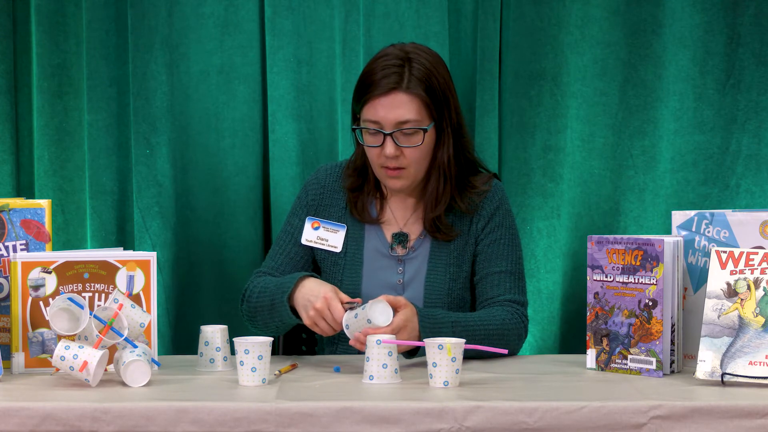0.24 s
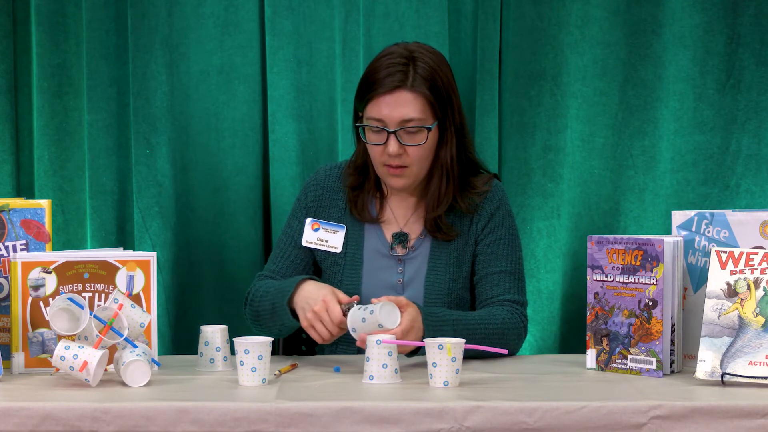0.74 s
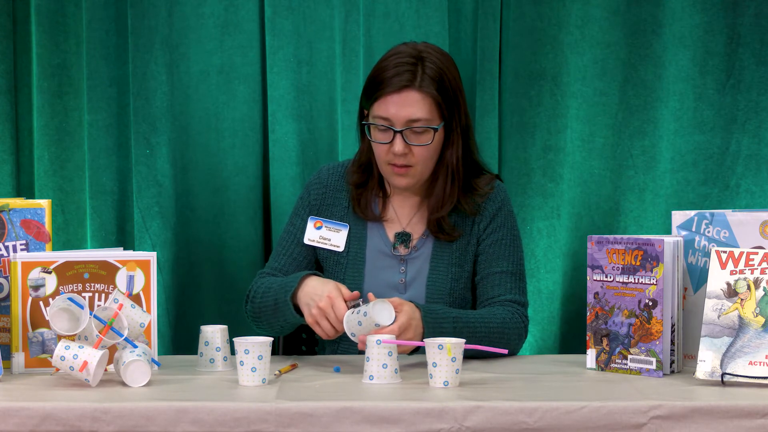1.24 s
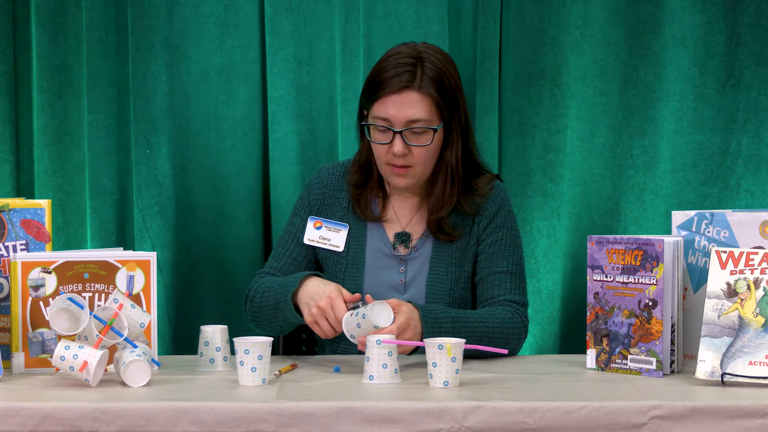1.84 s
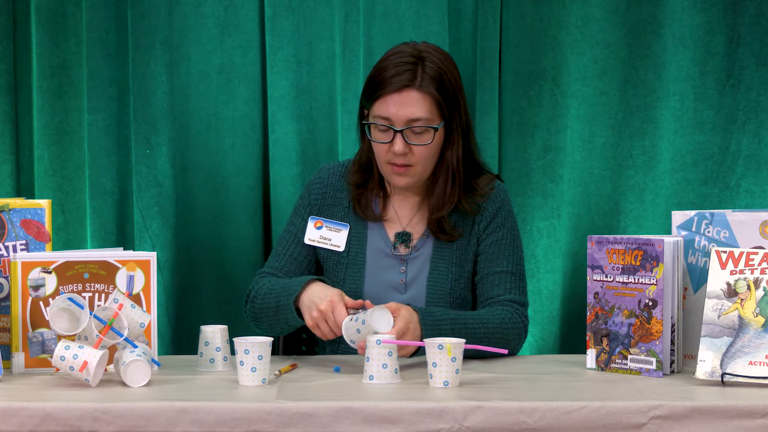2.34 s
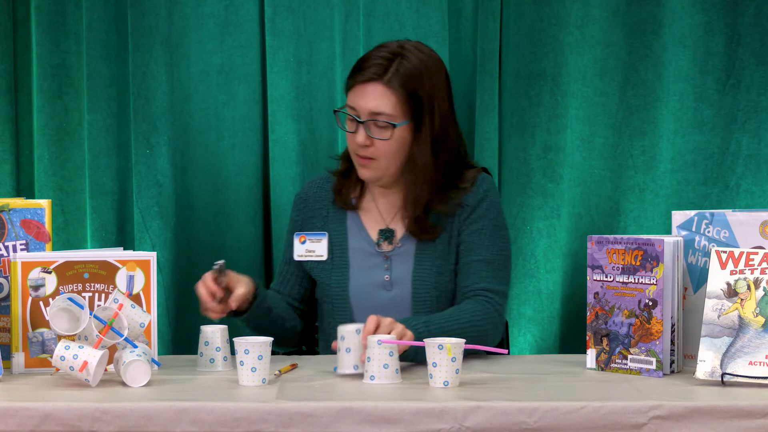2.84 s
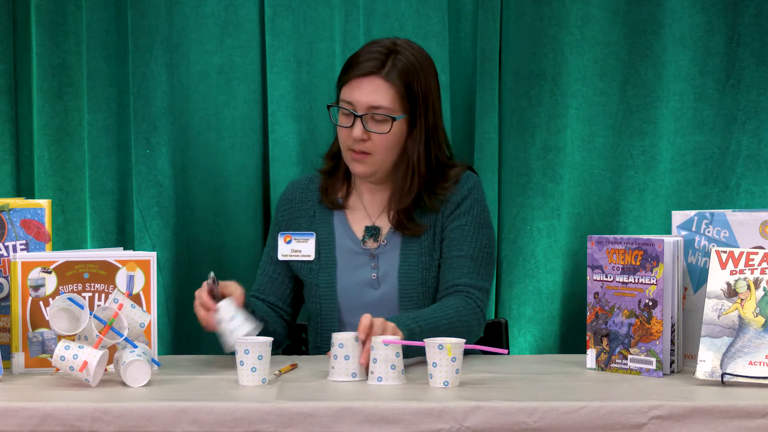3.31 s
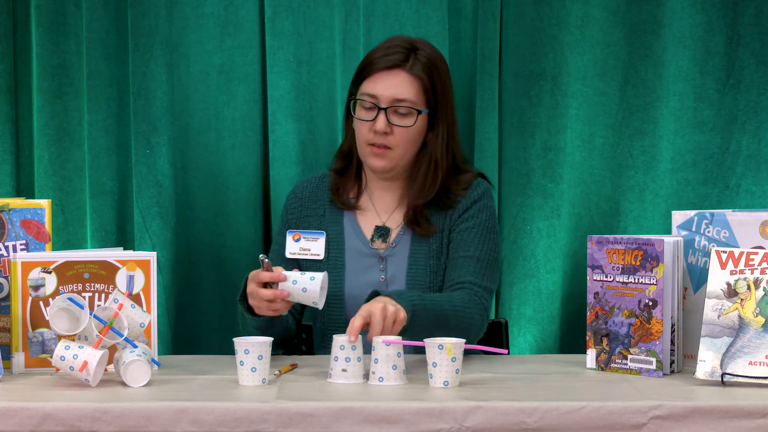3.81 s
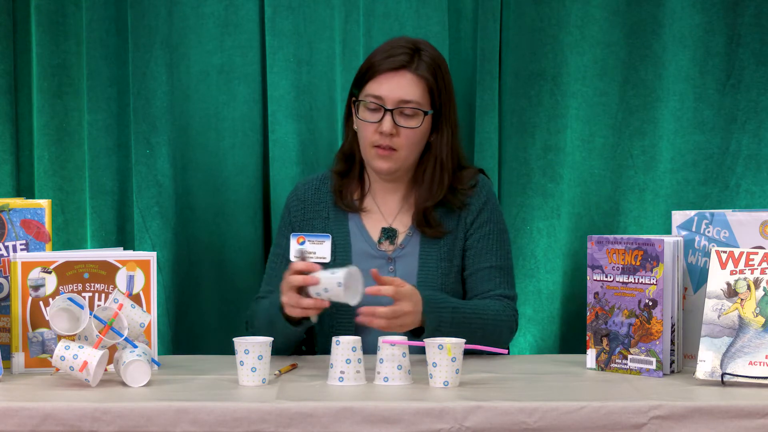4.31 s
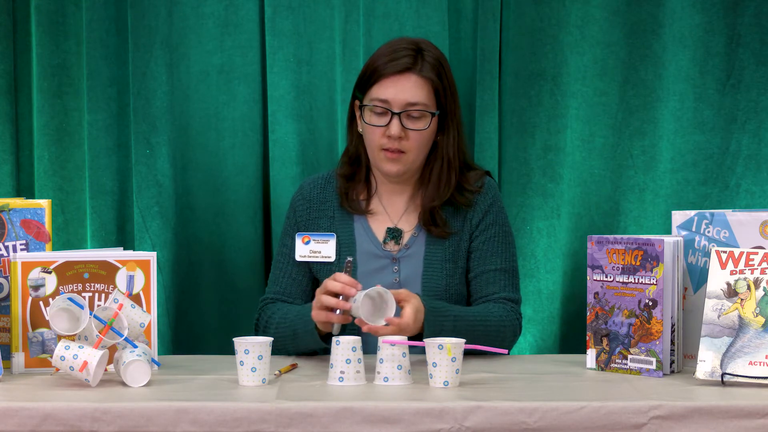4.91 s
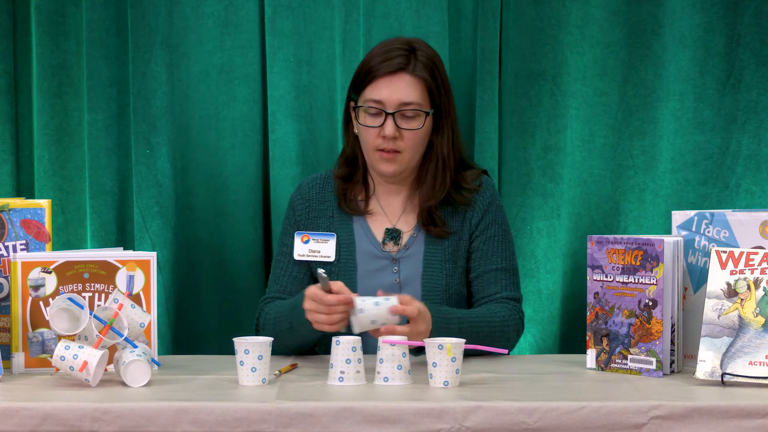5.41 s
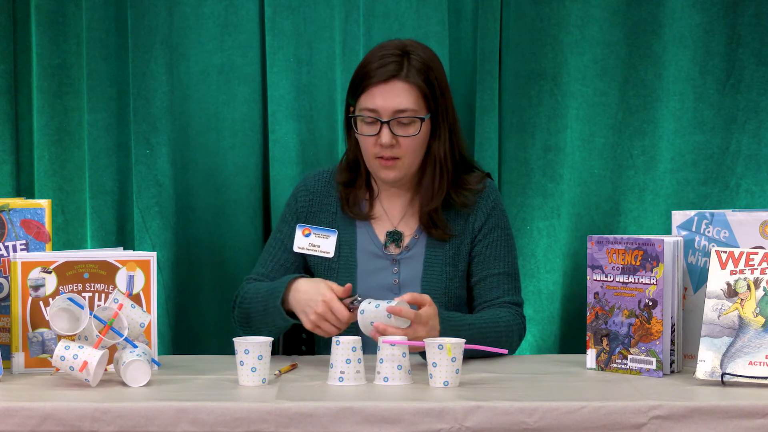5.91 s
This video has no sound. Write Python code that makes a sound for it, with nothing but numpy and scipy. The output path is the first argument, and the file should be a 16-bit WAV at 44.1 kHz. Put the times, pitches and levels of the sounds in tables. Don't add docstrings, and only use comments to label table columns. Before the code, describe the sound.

Quiet ventilation hum and soft hiss run throughout a curtained room with a short reverberant tail. A faint click comes near the start; at 0.32 s a punch jaw touches a paper cup and at 0.36 s snaps through, very loud, crunchy and slightly clipped. Metallic clicks, hollow taps and a quick brush cluster at 0.5-0.6 s, with sparser ticks to 1.2 s and a clear click at 1.6 s. A second equally loud snap lands at 2.3 s, followed by taps, rub and papery pop around 2.5 s. From 2.85 to 4.1 s cups scrape over cloth, with firm low hollow knocks at 3.2 s and a harder one near 4.0 s. From 4.3 to 5.9 s there are gentle finger rubs, tiny rim taps and clicks, and a brief thin squeak at 5.3 s. A sharp paper buckle pops at 6.0 s.

```python
import sys
import numpy as np
from scipy import signal
from scipy.fft import rfft, irfft, next_fast_len
from scipy.io import wavfile

SR = 44100
rng = np.random.default_rng(int(sys.argv[2]) if len(sys.argv) > 2 else 0)


def wav_out(sig):
    wavfile.write(sys.argv[1], SR, np.round(np.clip(np.atleast_2d(sig).T, -1, 1) * 32767).astype(np.int16))


def boost(x):
    u = np.asarray(x, float) / 20
    return 10 ** u


N = 271656

# (frequency [Hz], density [dB per Hz])
AIR_SPECTRUM = [(35, -48.5), (95, -6), (200, 1.5), (400, -9), (2000, -19.5), (13200, -27), (14200, -38),
                (15500, -55)]
# (frequency [Hz], width [Hz], rms level [dB])
DUCT_MODES = [(96, 9.7, -85), (132.4, 6.6, -77), (190.2, 8, -74)]
# (frequency [Hz], t60 [s], level [dB])
ROOM_TAIL = [(250, .3, -28), (463, 0.35, -6.5), (900, 0.35, -3), (1400, 0.48, -9.5), (2560, 0.36, -19.5),
             (5000, 0.36, -17), (8900, 0.52, -23.5), (14000, .3, -27)]
# (low [Hz], high [Hz])
FAMILY_HZ = [(1600, 6600), (5900, 14000), (440.8, 1600)]
# (frequency [Hz], width [Hz], gain [dB])
TABLE_MODES = [(292, 220, 7.5), (1400, 560, 1.5)]
# (frequency [Hz], width [Hz], gain [dB])
SLIDE_MODES = [
    [(2763, 265, 5.5), (3480, 480, 5.8), (4650, 357, 8), (5250, 200, 3.9)],
    [(7090, 400, 3.7), (9784, 400, 2)],
    [(560, 290, 19), (809, 40.6, 1.2), (1050, 50, 2.9)],
]
# (start [s], length [s], level [dB], hollow over wall [dB])
NUDGES = [
    (2.843, 0.047, -69.5, -14),
    (2.925, 0.0358, -58, -1.5),
    (3.31, 0.056, -66, 7),
    (3.391, .055, -65, -7),
    (3.889, 0.024, -81, 14.5),
]
# (start [s], swell [s], fade [s], peak level [dB], hollow over wall [dB])
PUSHES = [
    (2.96, .219, 0.00087, -59.5, 0),
    (3.18, 0.015, 0.053, -48, 7),
    (3.48, 0.071, .18, -55, -1),
    (3.922, 0.0627, 0.1027, -46.5, 2),
    (4.06, 0.015, 0.032, -70.5, 10),
]
# (time [s], peak level [dB], frequency [Hz], width [Hz])
KNOCKS = [
    (.524, -34, 1000, 280),
    (2.4937, -47, 900, 300),
    (3.1868, -26, 530, 280),
    (3.2007, -25, 435, 109),
    (3.257, -38.5, 537, 120),
    (3.3454, -41.5, 930, 120),
    (3.512, -50, 560, 150),
    (3.8932, -56, 598, 200),
    (3.952, -38.5, 500, 250),
    (3.9871, -24, 680, 368),
]
# (frequency [Hz], width [Hz], gain [dB])
RUB_MODES = [
    [(3520, 63, 4.9), (4235, 80, 12), (4727, 380, 9.2)],
    [(6850, 320, 12), (7460, 130, 3.7), (8700, 120, 6), (9115, 160, 8.1), (9800, 190, 11), (11000, 600, 2.8), (12600, 420, 2.7)],
    [(1076.6, 160, 8), (1400, 93, 4.4)],
]
# (start [s], length [s], level [dB], edge over wall [dB], hollow over wall [dB])
DRAGS = [(0.545, 0.068, -50.5, -5, -15), (1.055, 0.1, -60.5, -1, -5), (2.507, 0.032, -50.5, 5.5, 2.5),
         (2.623, 0.037, -70, 7, -4), (4.467, 0.079, -67.5, -4.5, -4.5), (4.548, 0.066, -58.5, 3, -7),
         (4.646, 0.035, -61, 10, -6), (4.775, 0.049, -73, -3.5, 6), (4.857, 0.051, -64, -8, -2.5),
         (4.913, 0.067, -62, -1, -3), (4.986, 0.044, -65.5, 4, -2), (5.056, 0.12, -69, .5, -3.5),
         (5.168, 0.089, -75.5, -3, 2), (5.237, 0.04, -56, 4, -4.5), (5.28, .02, -62.5, -4.5, -12),
         (5.306, .058, -57, 2, -4.5), (5.718, 0.042, -64.5, 2.5, -5.5), (5.763, 0.121, -62, -2, -9.5),
         (6.01, 0.093, -61.5, -10, -2.5)]
# (start [s], swell [s], fade [s], peak level [dB], edge over wall [dB])
BRUSHES = [(.508, 0.021, 0.00065, -36, 2), (1.005, 0.031, 0.0011, -54.5, -8),
           (2.255, 0.028, .001, -61.5, 3), (2.473, 0.032, 0.00057, -34.5, -0.5),
           (4.294, 0.0011, 0.019, -48, 5), (4.61, 0.00078, 0.033, -57, 4.5),
           (4.678, .001, 0.033, -57.5, -15), (4.74, 0.035, .03, -58, -5), (5.398, .001, .055, -63, 8),
           (5.481, 0.063, 0.08, -57, -1), (5.63, 0.02, .023, -56.5, 3.5), (5.83, .03, 0.053, -64, 2)]
# (frequency [Hz], width [Hz], gain [dB])
SQUEAK_MODES = [(9100, 560, 14), (11200, 990, 21)]
# (start [s], length [s], level [dB])
SQUEAKS = [
    (5.309, 0.0556, -54),
    (5.238, 0.013, -61.5),
]
# (width [Hz], gain [dB])
TICK_RING = [
    (500, 9.5),
    (1500, 8),
    (150, 11),
]
# (width [Hz], gain [dB])
TICK_AFTER_RING = [
    (90, 2),
    (200, 0),
    (50, 5.5),
]
# (frequency [Hz], width [Hz], gain [dB])
HANDLE_MODES = [(3870, 170, 4), (4958, 610, 3), (2450, 340, -5.5)]
# (time [s], level [dB], edge over wall [dB], wall [Hz])
CLICKS = [(.0674, -51, -7, 4900), (.3119, -68, 8.5, 5210), (.5144, -36, 3.5, 3730),
          (.5331, -28.5, -9, 3680), (.5643, -45, -2.5, 3600), (.6053, -40, -3, 3870),
          (1.0635, -51, -5, 4190), (1.1239, -56.5, 5, 5330), (1.1384, -47.5, -3.5, 5000),
          (1.5423, -63, -9, 4500), (1.5889, -36, 1, 3836), (1.853, -65.5, 3, 5170), (2.1432, -43, 1, 5290),
          (2.268, -61.5, 0.5, 5630), (2.495, -36, 7.5, 5150), (4.7328, -50.5, -1.5, 5210),
          (5.2725, -54.5, 4.5, 4730), (5.3554, -48, 4, 4440), (5.5191, -44, 6.5, 4620),
          (5.5456, -48.5, 5.5, 4395), (5.6532, -48, 4.5, 5930), (5.717, -65, 10, 4360)]
# (time [s], level [dB], hollow over wall [dB], hollow [Hz])
TAPS = [(.3337, -36.5, -3, 1333), (.469, -35, -0.5, 960), (0.4998, -42, -2.5, 900),
        (0.5225, -28.5, -1.5, 1033), (.528, -29.5, -5, 1030), (0.5708, -48, -5, 933),
        (0.7774, -29, -2.5, 1084), (.91, -37.5, 1, 1064), (0.9124, -33.5, 2, 1040), (0.921, -36.5, 1, 1040),
        (1.0535, -36.5, -10, 1430), (1.1611, -45, 4, 1043), (2.4923, -30.5, -6, 1004),
        (3.9229, -47.5, -3.5, 777), (3.9519, -33.5, 2, 1545), (4.5619, -42, 0.5, 1022),
        (4.5849, -40.5, -11, 1100), (4.7269, -56, -0.5, 1449), (4.972, -47.5, -8.5, 1486),
        (5.3118, -39.5, -7.5, 1230), (5.5294, -47.5, -11, 1160)]
# (time [s], level [dB], hollow over wall [dB], hollow [Hz])
RIM_TAPS = [
    (1.1055, -58, 5, 1040),
    (2.4645, -42.5, -1, 1000),
    (2.4787, -38.5, -1, 1410),
    (3.0189, -61.5, 14, 918),
    (3.4287, -60, 12.5, 870),
    (4.2948, -51, 8.5, 1090),
    (4.9163, -60.5, 8, 1240),
    (5.7559, -62, -10, 1315),
]
# (time [s], level [dB], hollow over wall [dB], wall [Hz], hollow [Hz])
POPS = [(.5973, -38, 1, 3570, 1500), (.9816, -56.5, 10, 1880, 1060), (1.1712, -42, 5, 3810, 1053),
        (2.5016, -28, -7, 3630, 1400), (2.6094, -73, 17, 1943, 903), (2.985, -46, -2.5, 2570, 1040),
        (3.308, -56.5, 7, 2714, 1140), (3.3327, -56.5, 10.5, 2800, 850), (3.341, -57, 10, 3460, 1030),
        (3.4396, -44, -5, 2690, 880), (3.5164, -47, 3.5, 2770, 760), (4.099, -53, -11, 5070, 752),
        (6.0019, -30, -9, 3590, 1400), (6.0027, -34, 1, 3600, 1750), (6.0889, -46.5, -5, 3570, 1645)]
# (frequency [Hz], width [Hz], gain [dB])
SNAP_MODES = [
    [(2000, 550, 7.5), (2410, 100, 6.5), (3160, 570, 12), (4360, 150, 4), (5290, 320, 8.5)],
    [(6237, 910, 4.5), (6903, 1000, 5.5), (8740, 370, 3.5), (10900, 400, 5)],
    [(680, 60, 2.5), (930, 200, 13), (1040, 58, 5.5), (1400, 48, 19)],
]
# (time [s], wall level [dB], edge level [dB], hollow level [dB])
SNAPS = [
    (0.3226, -21, -29, -24),
    (0.3584, -5, -5, -10.5),
    (2.2782, -25, -28, -26.5),
    (2.301, -5, -4.5, -9),
]


def unit(x):
    return x / np.sqrt(np.sum(x ** 2) + 1e-30)


def band(x, low_hz, high_hz):
    return signal.sosfilt(signal.butter(3, [low_hz, min(high_hz, .47 * SR)], "band", fs=SR, output="sos"), x)


def resonance(x, hz, width_hz):
    r = np.exp(-np.pi * width_hz / SR)
    zeros = np.array([1, 0, -1]) * (1 - r * r) / 2
    return signal.lfilter(zeros, [1, -2 * r * np.cos(2 * np.pi * hz / SR), r * r], x)


def response(modes, edges_hz, depth=0.96):
    b, a = signal.butter(3, np.minimum(edges_hz, .47 * SR), "band", fs=SR)
    out = signal.lfilter(b, a, signal.unit_impulse(1500))
    for hz, width_hz, gain_db in modes:
        out = out + (boost(depth * gain_db) - 1) * resonance(out, hz, width_hz)
    return unit(out)


def air():
    hiss_db, fan_hz, fan_db = -70.5, 191.7, -71
    size = next_fast_len(N)
    hz = np.maximum(np.arange(size // 2 + 1) * SR / size, 1)
    table_hz, table_db = np.transpose(AIR_SPECTRUM)
    shape_db = np.interp(np.log(hz), np.log(table_hz), table_db)
    hiss = unit(irfft(rfft(rng.standard_normal(size)) * boost(shape_db), size)[:N])
    white = rng.standard_normal(N)
    ducts = np.zeros(N)
    for duct_hz, width_hz, rms_db in DUCT_MODES:
        hum = resonance(resonance(white, duct_hz, width_hz), duct_hz, width_hz)
        ducts += boost(rms_db) * unit(hum)
    fan = boost(fan_db) * unit(np.sin(2 * np.pi * fan_hz * np.arange(N) / SR))
    return np.sqrt(N) * (boost(hiss_db) * hiss + ducts + fan)


def room(near, far):
    slap_s, slap_db = .0178, -22
    early_t60_s, early_db = 0.14, -18.5
    t = np.arange(round(.9 * SR)) / SR
    hz, t60_s, level_db = np.transpose(ROOM_TAIL)
    edges = np.r_[hz[0] / 1.5, np.sqrt(hz[1:] * hz[:-1]), hz[-1] * 1.3]
    white = rng.standard_normal((3, len(t)))
    tail = boost(early_db) * unit(white[2] * boost(-60 * t / early_t60_s) * (t > slap_s))
    build = np.clip((t - .008) / 0.0079, 0, 1)
    for k in range(len(hz)):
        share = np.sqrt((edges[k + 1] - edges[k]) / (SR / 2))
        decay = boost(-60 * t / t60_s[k]) * build
        tail += boost(level_db[k]) * share * unit(band(white[k % 2], edges[k], edges[k + 1]) * decay)
    lag = round(slap_s * SR)
    slap = boost(slap_db) * band(np.r_[np.zeros(lag), near[:N - lag]], 300, 10000)
    return signal.fftconvolve(far, tail)[:N] + slap


def strokes(rows, body, bend, edge_s, grain_db, crackle_per_s, crackle_db, grip_db):
    lift_per_octave = .4
    t, out = np.arange(N) / SR, np.zeros(N + 1500)
    r = np.exp(-2 * np.pi * 140 / SR)
    grain = signal.lfilter([1], [1, -2 * r, r * r], rng.standard_normal((3, N)))
    grain = grain + grain[0]
    crackle_on = rng.random(N) < crackle_per_s / SR
    crackle = crackle_on * boost(crackle_db + 3.9 * np.minimum(rng.exponential(1, N), 3))
    rough = (boost(grain_db * grain / grain.std()) + crackle) * rng.standard_normal((3, N))
    for row, grip in zip(rows, rng.standard_normal((len(rows), 3, 8))):
        start, swell_s, fade_s, peak_db, edge_db, hollow_db, swell_db, fade_db = row
        peak, end = start + swell_s, start + swell_s + fade_s
        first, last = round(start * SR), round(end * SR)
        now = t[first:last]
        ramp = np.clip(np.minimum(now - start, end - now) / edge_s, 0, 1) ** .5
        away = np.interp(now, [start, peak, end], [1, 0, 1]) ** bend
        level_db = peak_db - away * np.where(now < peak, swell_db, fade_db)
        for k, offset_db in enumerate([0, edge_db, hollow_db]):
            tilt_db = lift_per_octave * offset_db * (k == 1)
            shift = 1 + .025 * grip[k, -1]
            modes = []
            for (hz, width_hz, gain_db), g in zip(body[k], grip[k]):
                lift_db = tilt_db * np.log2(hz / FAMILY_HZ[k][0])
                modes.append((hz * shift, width_hz, gain_db + grip_db * g + lift_db))
            force = ramp * boost(level_db + offset_db) * rough[k, first:last]
            sound = signal.fftconvolve(force, response(modes, FAMILY_HZ[k]))
            out[first:first + len(sound)] += sound
    return out[:N]


def slides():
    edge_db, nudge_sag_db, push_swell_db, push_fade_db = -1, 5, 8, 21.5
    rows = [(s, 0, length_s, db, edge_db, hollow_db, 0, nudge_sag_db)
            for s, length_s, db, hollow_db in NUDGES]
    rows += [(s, swell_s, fade_s, db, edge_db, hollow_db, push_swell_db, push_fade_db)
             for s, swell_s, fade_s, db, hollow_db in PUSHES]
    return boost(-2.5) * strokes(rows, SLIDE_MODES, bend=1.9, edge_s=0.00081, grain_db=1.5,
                               crackle_per_s=58, crackle_db=12.5, grip_db=1.2)


def knocks():
    out = np.zeros(N + 1500)
    for s, peak_db, hz, width_hz in KNOCKS:
        ring = response([(hz, width_hz, 16)] + TABLE_MODES, (260, 1300))
        first = round(s * SR)
        out[first:first + len(ring)] -= boost(peak_db) * ring / np.abs(ring).max()
    return out[:N] * boost(np.array([[0.5], [-5.0]]))


def rubs():
    hollow_db, drag_sag_db, brush_swell_db, brush_fade_db = -6, 1.5, 12.5, 16.5
    rows = [(s, 0, length_s, db, edge_db, drag_hollow_db, 0, drag_sag_db)
            for s, length_s, db, edge_db, drag_hollow_db in DRAGS]
    rows += [(*row, hollow_db, brush_swell_db, brush_fade_db) for row in BRUSHES]
    return boost(-5) * strokes(rows, RUB_MODES, bend=1.1, edge_s=.002, grain_db=1.0,
                             crackle_per_s=50, crackle_db=9, grip_db=2.5)


def squeak():
    out = np.zeros(N)
    for s, length_s, db in SQUEAKS:
        white = rng.standard_normal((2, 4000))
        grain = boost(2.5 * np.repeat(white[0], 120)[:4000])
        skid = (boost(db) * grain * white[1])[:round(length_s * SR)]
        sound = signal.fftconvolve(skid, response(SQUEAK_MODES, FAMILY_HZ[1]))
        first = round(s * SR)
        out[first:first + len(sound)] += sound
    return out


def hits(times_s, levels_db, bodies, hold_s, fade_s, after_db, far_db, far_depth):
    t = np.arange(900) / SR
    shape = np.exp(-np.maximum(t - hold_s, 0) / fade_s) + boost(after_db) * np.exp(-t / 0.01)
    size = np.sqrt(np.sum(shape ** 2))
    out = np.zeros((2, N + 2400))
    roughs = rng.standard_normal((len(times_s), 3, len(t)))
    for s, family_db, body, rough in zip(times_s, levels_db, bodies, roughs):
        first = round(s * SR)
        for db, modes, edges_hz, noise in zip(family_db, body, FAMILY_HZ, rough):
            near = boost(db) * size * unit(np.convolve(response(modes, edges_hz), noise * shape))
            far = boost(db + far_db) * size * response(modes, edges_hz, depth=far_depth)
            out[0, first:first + len(near)] += near
            out[1, first:first + len(far)] += far
    return out[:, :N]


def ticks():
    edge_hz = 8000
    click_hollow_db, click_hollow_hz = -20.5, 1400
    tap_edge_db, tap_wall_hz = -2.5, 4900
    rim_edge_db, rim_wall_hz = 6.5, 4500
    pop_edge_db = -11.5
    # (time [s], wall [dB], edge [dB], hollow [dB], wall [Hz], hollow [Hz])
    rows = [(s, db, db + edge, db + click_hollow_db, hz, click_hollow_hz) for s, db, edge, hz in CLICKS]
    rows += [(s, db, db + tap_edge_db, db + hollow, tap_wall_hz, hz) for s, db, hollow, hz in TAPS]
    rows += [(s, db, db + rim_edge_db, db + hollow, rim_wall_hz, hz) for s, db, hollow, hz in RIM_TAPS]
    rows += [(s, db, db + pop_edge_db, db + hollow, *hz) for s, db, hollow, *hz in POPS]
    rows = np.array(rows)
    bodies = []
    for wall_hz, hollow_hz in rows[:, 4:]:
        spots_hz = (wall_hz, edge_hz, hollow_hz)
        wall, edge, hollow = [[(hz, *ring), (hz, *after)]
                              for hz, ring, after in zip(spots_hz, TICK_RING, TICK_AFTER_RING)]
        bodies.append([wall + HANDLE_MODES, edge, hollow])
    return boost(-2.0) * hits(rows[:, 0], rows[:, 1:4], bodies, hold_s=.0006, fade_s=0.0014,
                            after_db=-27.0, far_db=-3.0, far_depth=0.94)


def snaps():
    rows = np.array(SNAPS)
    return boost(-2.5) * hits(rows[:, 0], rows[:, 1:], [SNAP_MODES] * len(rows), hold_s=.0025, fade_s=0.0013,
                            after_db=-23, far_db=-3.5, far_depth=0.91)


def scene():
    mic_top_hz = 12500
    near, far = snaps() + ticks() + knocks() + rubs() + squeak() + slides()
    mic = signal.butter(2, mic_top_hz, fs=SR, output="sos")
    heard = signal.sosfilt(mic, near + room(near, far))
    return (heard + air())[None]


def low_pass(x):
    return signal.sosfilt(signal.butter(12, 16660, fs=SR, output="sos"), x)


def record(dry):
    mix = np.clip(dry, -1.0, 1.0)
    return low_pass(mix)


dry = scene()
out = record(dry)
wav_out(out)
```